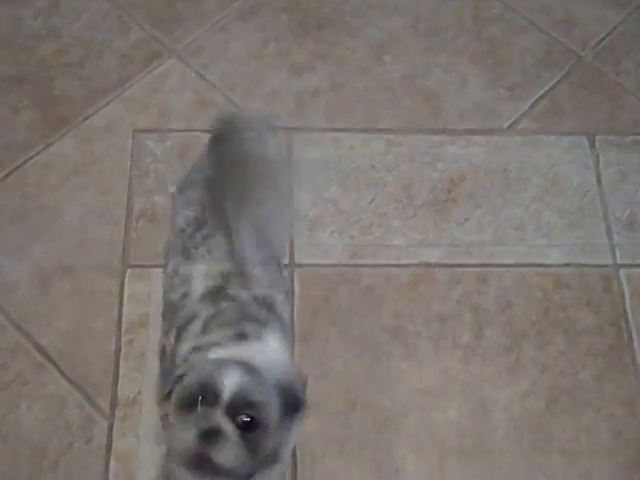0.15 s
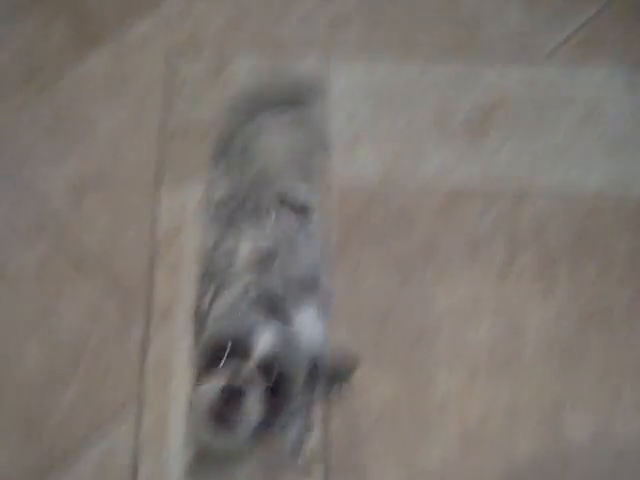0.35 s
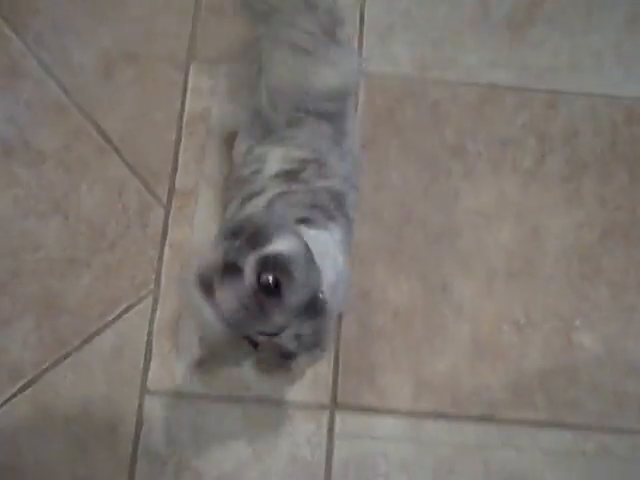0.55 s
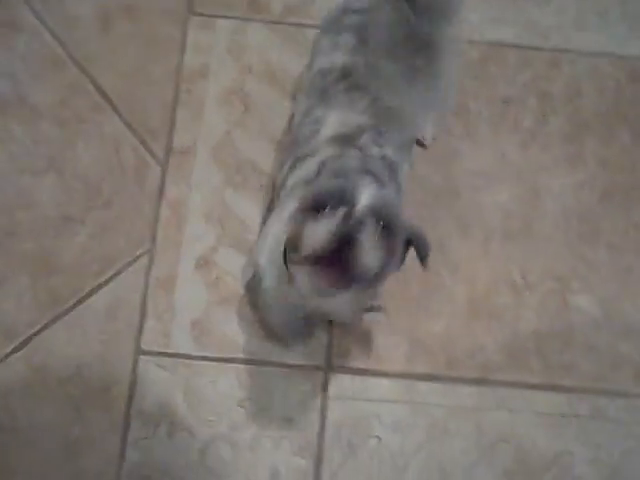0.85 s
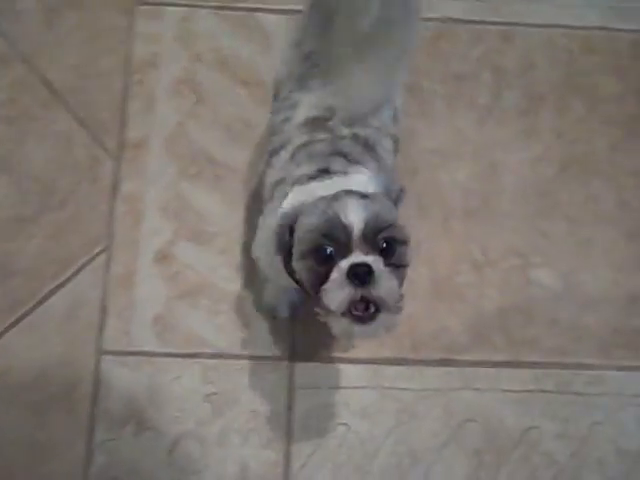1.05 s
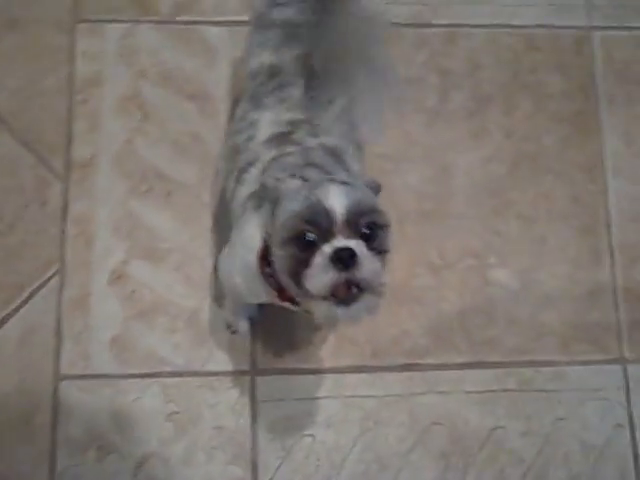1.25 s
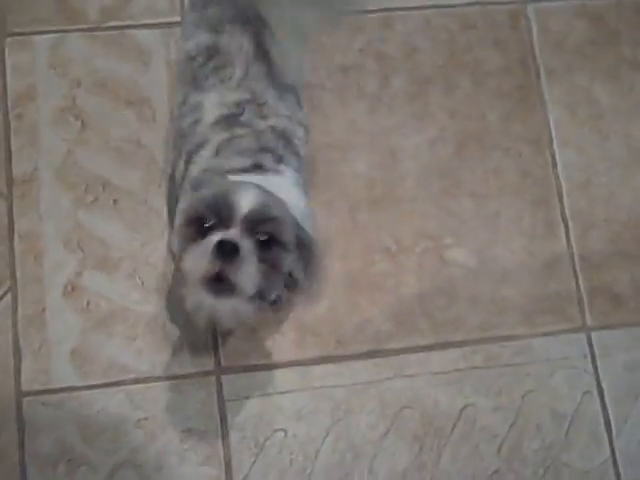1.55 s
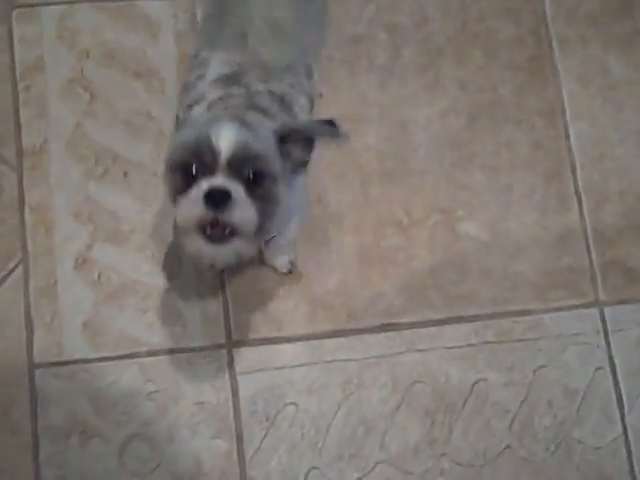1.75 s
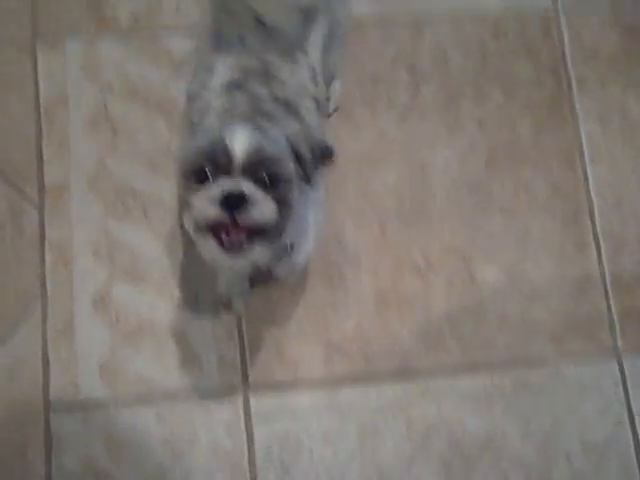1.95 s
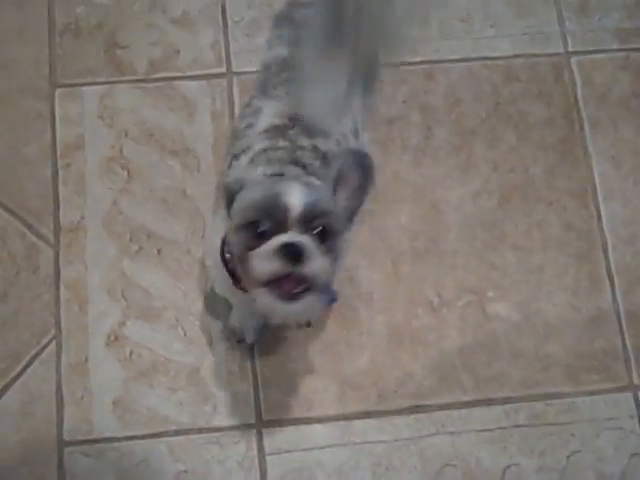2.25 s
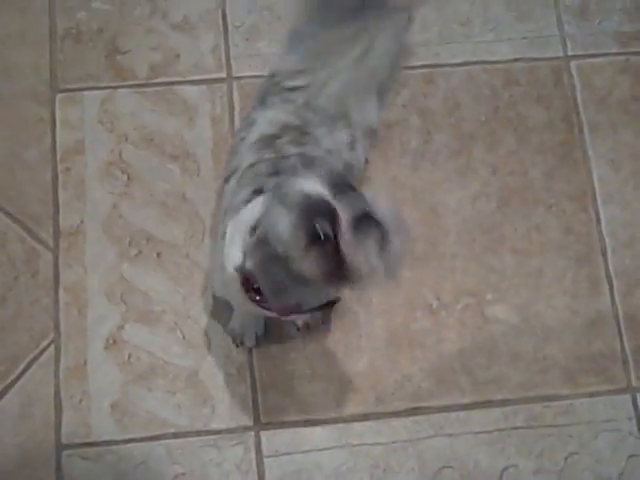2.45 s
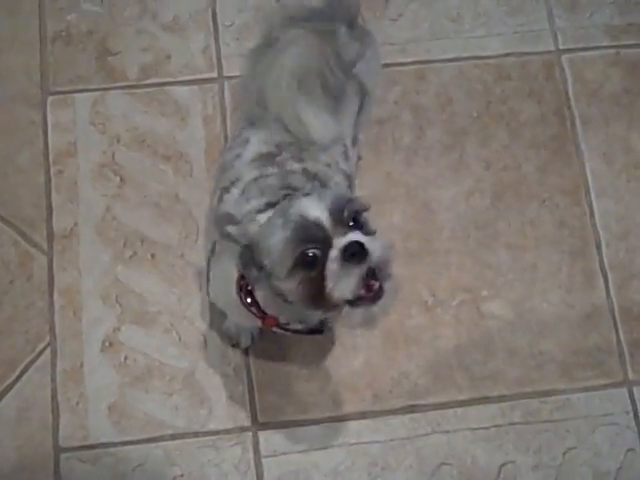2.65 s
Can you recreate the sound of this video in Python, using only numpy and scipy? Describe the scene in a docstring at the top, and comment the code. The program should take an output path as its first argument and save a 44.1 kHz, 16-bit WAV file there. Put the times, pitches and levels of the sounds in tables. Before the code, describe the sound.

High, slightly hoarse barks from a small dog close by, with faint panting between them.

```python
"""A faint breath over quiet room noise, then a small dog barks six times close to the microphone.
Each bark glides up and falls as the mouth shuts; the first four turn hoarse near the top, the last two
already rise hoarse. The room is tiled and rings on after each one. Between barks the dog pants through
mouth and nose, its collar tag chinks and something ticks faintly. The loudest peaks clip."""
import sys
import numpy as np
from scipy import signal
from scipy.fft import rfft, irfft
from scipy.io import wavfile
from scipy.ndimage import uniform_filter1d

SR = 44100
rng = np.random.default_rng(int(sys.argv[2]) if len(sys.argv) > 2 else 0)


def dump_mix(stems):
    """Bounce the given channels to the path in sys.argv[1] as a 16-bit WAV at rate SR."""
    frames = np.atleast_2d(stems).T  # one column per channel
    limited = np.clip(frames, -1, 1)  # hard clip at full scale
    pcm = np.round(limited * 32767).astype(np.int16)
    wavfile.write(sys.argv[1], SR, pcm)


N = 123479


def gain_of(db):
    """Decibels to gain."""
    return 10 ** (np.asarray(db) / 20)


def unit_rms(x):
    """Scales to rms 1."""
    return x / np.sqrt(np.mean(x ** 2) + 1e-20)


def value_at(points, hz):
    """Reads a table on a log-frequency axis."""
    point_hz, value = np.transpose(points)
    return np.interp(np.log(hz + 1), np.log(point_hz + 1), value)


def add(mix, start_s, sound):
    """Mixes a sound in at start_s."""
    part = mix[round(start_s * SR):][:len(sound)]
    part += sound[:len(part)]


def noise(spectrum, size):
    """Noise shaped by (frequency_hz, level_db) points, falling steeply below the first."""
    hz = np.fft.rfftfreq(size, 1 / SR)
    shape = gain_of(value_at(spectrum, hz)) * np.minimum(hz / spectrum[0][0], 1) ** 4
    return unit_rms(irfft(rfft(rng.standard_normal(size)) * shape, size))


def wobble(size, smooth_samples):
    """Smoothed random motion at rms 1."""
    return unit_rms(uniform_filter1d(rng.standard_normal(size), size=smooth_samples))


def resonate(x, peaks):
    """Sum of steep resonances that may move: shift down, smooth twice, shift back."""
    out = np.zeros(len(x))
    for k, (hz, width_hz, db) in enumerate(peaks):
        carrier = np.exp(2j * np.pi * np.cumsum(hz * np.ones(len(x))) / SR)
        pole = np.exp(-np.pi * width_hz / SR)
        slow = signal.lfilter([(1 - pole) ** 2], [1, -2 * pole, pole * pole], x / carrier)
        out += (-1) ** k * gain_of(db) * 2 * (carrier * slow).real
    return out


# Background of the room at the microphone: frequency_hz, level_db
ROOM_TONE_SPECTRUM = [(88, -71), (150, -11), (376, -2), (494, -12), (1340, 1.5), (2400, 4.5), (2650, -9),
                      (4240, -13.5), (16000, -44.5)]

def room_tone(level_db=-59, rise_db=0.5, rise_s=.3):
    """Quiet noise that comes up slightly at the start, then holds."""
    rise = np.minimum(np.arange(N) / SR / rise_s, 1)
    return gain_of(level_db + rise_db * rise) * noise(ROOM_TONE_SPECTRUM, N)


# Resonances of the panting mouth and of the nose: centre_hz, width_hz, level_db
MOUTH_RESONANCES = [(918, 350, -2), (1516, 170, 1.5), (2205, 590, 5.5), (3110, 900, -15.5), (3547, 200, 3)]
NOSE_RESONANCES = [(5530, 1400, 0), (7070, 540, -6), (8600, 2400, -16), (11500, 2900, -15)]
# Breaths, close by: start_s, rise_s, hold_s, fall_s, mouth_db, nose_db, wheeze_hz, end_hz, wheeze_db
BREATHS = [(0.038, 0.078, 0.017, 0.015, -41.5, -54.5, 344.3, 450, -53.5),
           (1.387, 0.021, 0.014, .02, -55.5, -73.5, 400, 425, -77),
           (1.656, 0.0217, .04, 0.063, -56, -68, 400, 400, -80.5),
           (1.928, 0.068, 0.014, 0.005, -46.5, -65.5, 414, 410, -60.5),
           (2.185, 0.039, 0.046, 0.018, -49.5, -62.5, 400, 400, -89.5),
           (2.557, 0.033, 0.099, 0.061, -50, -66, 400, 407, -73)]

def pant(rise_s, hold_s, fall_s, mouth_db, nose_db, wheeze_hz, end_hz, wheeze_db):
    """Air hisses through the mouth and short nose, with a faint wheeze that bends to end_hz."""
    length_s = rise_s + hold_s + fall_s
    t = np.arange(0, length_s, 1 / SR)
    swell = np.interp(t, [0, rise_s, rise_s + hold_s, length_s], [0, 1, 1, 0]) ** 0.63
    flutter = gain_of(2.0 * wobble(len(t), 300))
    air = flutter * noise([(700, 0.025), (16000, 0)], len(t))
    mouth = gain_of(mouth_db) * unit_rms(resonate(air, MOUTH_RESONANCES))
    nose = gain_of(nose_db) * unit_rms(resonate(air, NOSE_RESONANCES))
    cycles = np.cumsum(wheeze_hz + (end_hz - wheeze_hz) * (t / t[-1]) ** 3) / SR
    wheeze = flutter * sum(np.sin(2 * np.pi * k * cycles) / k for k in range(1, 5))
    return swell * (mouth + nose + gain_of(wheeze_db) * wheeze)


# Colour of the clean voice and of the breath under it: frequency_hz, level_db
CLEAN_SPECTRUM = [(400, 1), (750, 4.5), (1000, 1), (1500, -2), (2150, -2), (2700, -18.5), (3250, -12),
                  (3900, -42.5), (5000, -25.5), (8000, -50)]
BREATH_SPECTRUM = [(3500, 0.5), (5000, -3.5), (5800, 5.5), (6800, -1.5), (9000, -6), (11500, -3),
                   (16000, -13.5)]
# Throat resonances, mouth open and shut: open_hz, shut_hz, width_hz, level_db
THROAT_RESONANCES = [(278, 244, 340, -23.5), (1010, 880, 345, 0.5), (1350, 910, 697, -2.5),
                     (2220, 2110, 540, -8), (2800, 2660, 357, -8), (3410, 2410, 170, -15.5)]
# The mouth in each bark: close_at_s, closing_s, open_hz, shut_hz, resonance_db, beat_depth
BARK_MOUTHS = [(.225, 0.046, 2040, 1520, 7.5, 0.17), (0.541, 0.046, 1780, 1423, 5, 0.29),
               (0.923, 0.047, 1610, 1340, 9.5, 0.87), (1.538, 0.065, 1543, 1440, 1, 0.24),
               (2.108, 0.015, 1678, 1455, 7, 0.35), (2.402, 0.07, 2115, 1915, 1, 0.081)]
# Barks close to the microphone, one curve each: time_s, pitch_hz, effort_db, roughness (0-1)
BARK_CURVES = [
    [(.199, 483, -27, 0.13), (.208, 746.6, -17, 0.31), (.215, 944.6, 0.5, 0.14), (.223, 1072, -15.5, 0.09),
     (.232, 1192, -7.5, 0.84), (.245, 1342, -10, 0.79), (.27, 1315, -4.5, 0.75), (.286, 1223, -10.5, 0.24),
     (.3, 900, -74, 0), (.325, 417, -61, 0)],
    [(.508, 473, -37, 0.16), (.52, 791.4, -21.5, 0.2), (.53, 1005, -8, 0.02), (.545, 1140, -10.5, 0),
     (.556, 1224, -18.5, .6), (.57, 1348, -4, 0.64), (.595, 1427, -19.5, 0.65), (.604, 1272, -17, 0.35),
     (.614, 967, -17.5, .1), (.628, 773, -27, 0.13), (.655, 424, -47.5, 0.27)],
    [(.866, 340.6, -49, 0.54), (.885, 675.4, -29.5, 0.36), (.891, 954, -21, 0.07), (.898, 956, -14, 0.07),
     (.903, 1099, -11.5, 0), (.926, 1170, -7, 0.08), (.933, 1296, -17.5, 0.25), (.95, 1383, -18, 0.76),
     (.968, 1230, -17, 0.03), (.985, 906, -23.5, 0.37), (1.025, 421.5, -46, 0.12)],
    [(1.395, 367.8, -57.5, 0.03), (1.43, 483.4, -45, 0), (1.47, 703.3, -34, 0), (1.497, 832.2, -30.5, 0.02),
     (1.51, 864, -18, 0.27), (1.53, 1047, -29, 0.68), (1.56, 1353, -11.5, .8), (1.578, 1062, -14.5, 0.23),
     (1.592, 856, -9.5, 0.04), (1.605, 765.6, -21.5, 0.31), (1.64, 379, -44, 0.33)],
    [(2.051, 421.6, -47, 0.03), (2.064, 899, -24.5, 0.95), (2.08, 1039, -15, 0.51),
     (2.097, 1103, -19, 0.43), (2.106, 1287, -16, 0.77), (2.13, 1280, -16, 0.4), (2.143, 856, -11.5, 0.14),
     (2.154, 732, -29, .2), (2.17, 500, -43, 0.1)],
    [(2.372, 416, -33.5, 0.53), (2.385, 862.8, -29, 0.77), (2.395, 1060, -18, 0.77),
     (2.415, 1109, -15, 0.54), (2.437, 1231, -11, .3), (2.455, 1147, -24, 0.53), (2.48, 841.4, -18, 0.48),
     (2.495, 736, -26, 0.09), (2.52, 391, -41.5, 0.42)],
]

def bark(curve, close_at_s, closing_s, open_hz, shut_hz, resonance_db, beat_depth):
    """Clean harmonics blend with wobbling, beating pulses and puffs through a throat that closes."""
    jitter, shimmer_db, rasp_db = .05, 11.5, 3  # at full roughness
    breath_db, shut_loss_db = -20.5, -8.5
    times, *tracks = np.transpose(curve)
    t = np.arange(times[0], times[-1], 1 / SR)
    pitch_hz, effort_db, rough = (np.interp(t, times, track) for track in tracks)
    opening = np.clip(1 - (t - close_at_s) / closing_s, 0, 1)
    cycles = np.cumsum(pitch_hz * (1 + jitter * rough * wobble(len(t), 90))) / SR

    tilt_db_per_octave = 0.131 * np.minimum(effort_db - 17.5, 0)  # a softer voice is duller
    clean = np.zeros(len(t))
    for k in range(1, 8):
        harmonic_db = value_at(CLEAN_SPECTRUM, k * pitch_hz) + tilt_db_per_octave * np.log2(k)
        clean += gain_of(harmonic_db) * np.cos(2 * np.pi * k * cycles)

    folds = sum(np.cos(2 * np.pi * k * cycles) / k for k in range(1, 6))
    every_third_pulse = np.cos(2 * np.pi / 3 * cycles)
    beat = 1 + 2 * beat_depth * np.minimum(2 * rough, 1) * every_third_pulse
    puffs = (.5 + np.exp(-(cycles % 1) / 0.14)) * rng.standard_normal(len(t))
    airflow = (1 - rough) * unit_rms(folds * beat) + rough * unit_rms(puffs)
    peaks = THROAT_RESONANCES + [(open_hz, shut_hz, 209, resonance_db)]
    throat = [(shut + opening * (wide - shut), width, db) for wide, shut, width, db in peaks]
    rasp = unit_rms(resonate(airflow, throat))

    pulsing = unit_rms(1 + np.abs(signal.hilbert(rasp)))
    breath_gain = gain_of(breath_db + shut_loss_db * (1 - opening)) * (0.24 + rough)
    breath = breath_gain * pulsing * noise(BREATH_SPECTRUM, len(t))
    shimmer = gain_of(shimmer_db * rough * wobble(len(t), 200))
    voice = (1 - rough) ** 2 * clean * shimmer + gain_of(rasp_db) * rough * (2 - rough) * rasp + breath
    small_head = signal.butter(3, 206, "high", fs=SR, output="sos")  # radiates no bass
    return gain_of(effort_db) * signal.sosfilt(small_head, voice) * signal.windows.tukey(len(t), .06)


# First bounces off floor and walls: delay_s, level_db
EARLY_ECHOES = [(.0021, -7.5), (.0058, -13), (.0093, -12), (.0137, -25.5)]
# Colour of the tiled room's ring: frequency_hz, level_db
RING_SPECTRUM = [(60, -56), (200, -22), (400, 9.5), (650, 3.5), (850, 3.5), (1150, 4), (1550, 1.5),
                 (2000, -6), (4000, -4.5), (7000, -6), (12000, -9)]
# How long it rings: frequency_hz, t60_s
RING_DECAY = [(250, 1), (660, 0.45), (1000, 0.89), (1200, 0.73), (1450, 1), (1740, 0.57), (3000, 0.86),
              (5000, 0.49), (12000, 1)]

def tiled_room(sound, tail_db=-12.5, tail_start_s=0.0087):
    """Floor and wall echoes, then scattered reflections dying away band by band."""
    reflections = np.zeros(SR)
    slots = np.arange(0, SR - 20, 20)  # one reflection somewhere in every 20 samples
    reflections[slots + rng.integers(0, 20, len(slots))] = rng.choice([-1., 1.], len(slots))
    hz, t, bands = signal.stft(reflections, SR, nperseg=256)
    decay_db = 60 * t / value_at(RING_DECAY, hz)[:, None]
    bands = bands * gain_of(value_at(RING_SPECTRUM, hz)[:, None] - decay_db)
    tail = signal.istft(bands, SR, nperseg=256)[1][:SR]
    fade_in = np.clip(np.arange(SR) / SR / tail_start_s - 1, 0, 1)
    response = gain_of(tail_db) * tail / np.linalg.norm(tail) * fade_in
    for k, (delay_s, level_db) in enumerate(EARLY_ECHOES):
        add(response, delay_s, (-1) ** k * gain_of([level_db]))
    return signal.fftconvolve(sound, response)[:N]


# Modes of the collar tag: pitch_hz, level_db, t60_s
TAG_MODES = [(10245, 0, .35), (11780, -3, .16), (15000, -15, .07), (9550, -18, .15)]
# Knocks on the tag, close by: start_s, level_db, other_modes_db (added to all modes but the first)
TAG_CHINKS = [(.339, -49, 1), (.446, -43, -3), (2.164, -55, 4), (2.232, -62, 4)]

def tag_chink(level_db, other_modes_db):
    """The collar tag clicks and rings in a few high modes."""
    t = np.arange(SR // 3) / SR
    ring = sum(gain_of(db + other_modes_db * (k > 0) - 60 * t / t60_s) * np.sin(2 * np.pi * hz * t)
               for k, (hz, db, t60_s) in enumerate(TAG_MODES))
    click = .3 * np.diff(rng.standard_normal(len(t) + 2), n=2) * np.exp(-t / 0.003)
    return gain_of(level_db) * (ring + click)


# Faint ticks, perhaps claws on the tiles: start_s, level_db
FAINT_TICKS = [(0.97, -53), (1.1076, -51), (1.2001, -51), (1.659, -49), (1.707, -48), (2.216, -41),
               (2.6304, -51)]

def tick(level_db, decay_s=0.00069):
    """A short, bright click of noise."""
    t = np.arange(400) / SR
    return gain_of(level_db) * noise([(6000, 0), (16000, 0)], len(t)) * np.exp(-t / decay_s)


def scene():
    """What reaches one microphone: the dog close by, the tiled room around it and the room tone."""
    dog = np.zeros(N)
    for source, events in ((pant, BREATHS), (tag_chink, TAG_CHINKS), (tick, FAINT_TICKS)):
        for start_s, *settings in events:
            add(dog, start_s, source(*settings))
    for curve, mouth in zip(BARK_CURVES, BARK_MOUTHS):
        start_s = curve[0][0]
        add(dog, start_s, bark(curve, *mouth))
    return (dog + tiled_room(dog) + room_tone())[None]


def record(dry):
    """A faint treble hiss follows the loudness; the loudest peaks clip; the highest treble is cut."""
    hiss_db, follow_s, knee = -44, .002, 30
    bass_cut_hz, treble_cut_hz = 12, 15850
    loudness = np.sqrt(abs(uniform_filter1d(dry ** 2, round(follow_s * SR))))
    hissy = dry + gain_of(hiss_db) * loudness * noise([(4200, 0), (16000, -3)], N)
    ceiling = np.where(hissy > 0, .7, .74)  # upward peaks flatten sooner
    clipped = hissy / (1 + (abs(hissy) / ceiling) ** knee) ** (1 / knee)
    highpass = signal.butter(1, bass_cut_hz, "high", fs=SR, output="sos")
    lowpass = signal.firwin(1023, treble_cut_hz, window=("kaiser", 9), fs=SR)
    return signal.oaconvolve(signal.sosfilt(highpass, clipped), lowpass[None], "same")


dry = scene()
out = record(dry)
dump_mix(out)
```